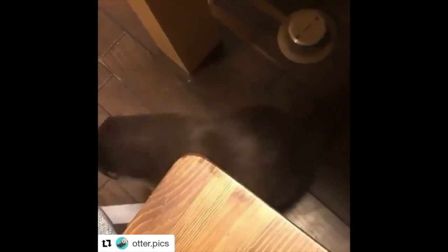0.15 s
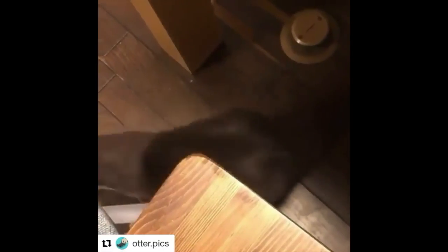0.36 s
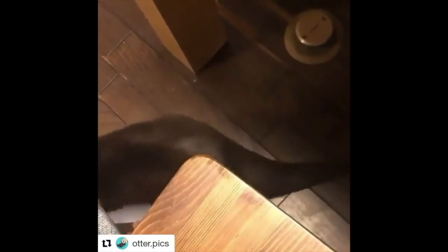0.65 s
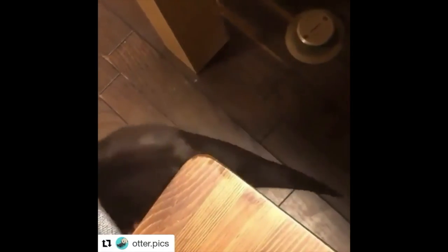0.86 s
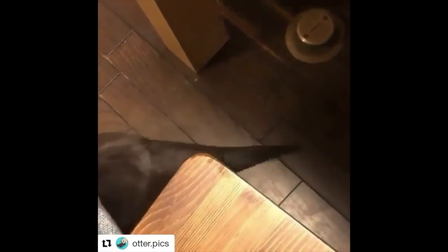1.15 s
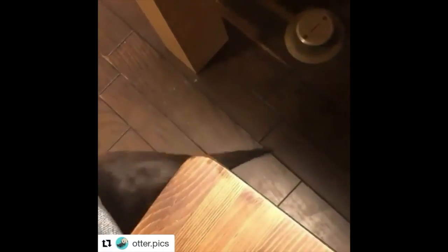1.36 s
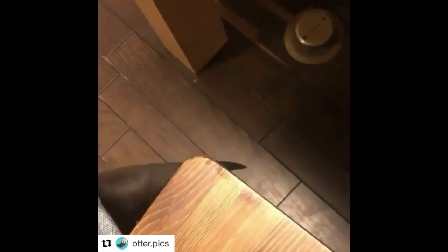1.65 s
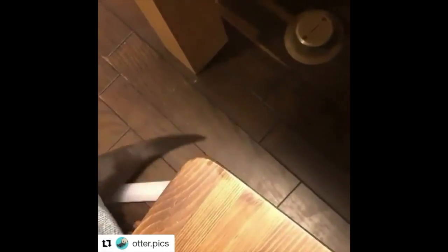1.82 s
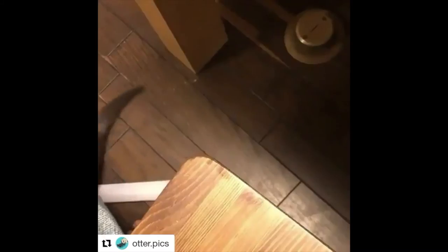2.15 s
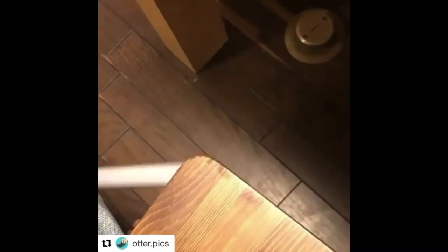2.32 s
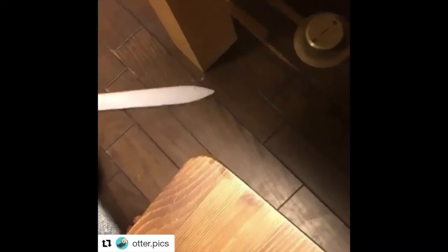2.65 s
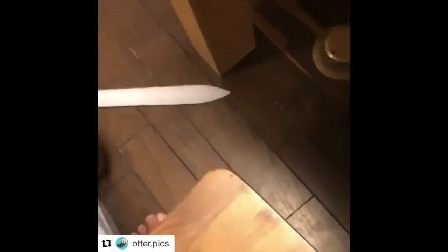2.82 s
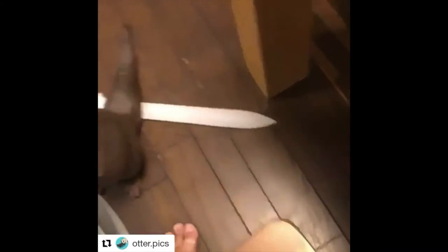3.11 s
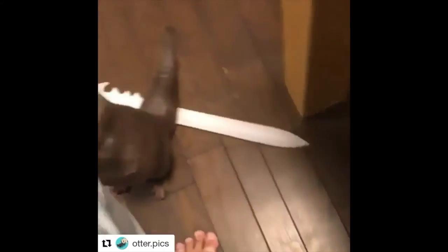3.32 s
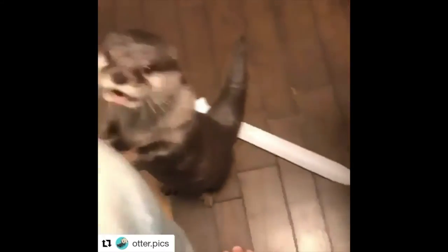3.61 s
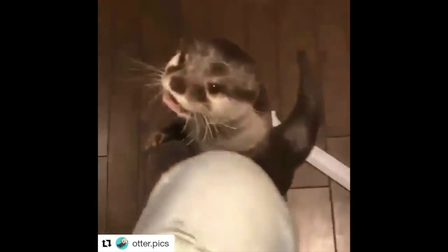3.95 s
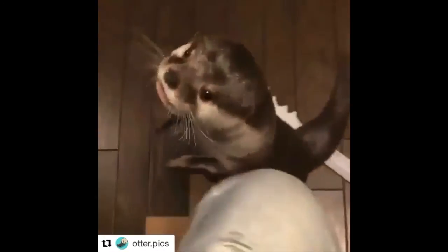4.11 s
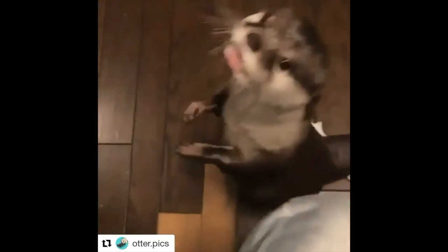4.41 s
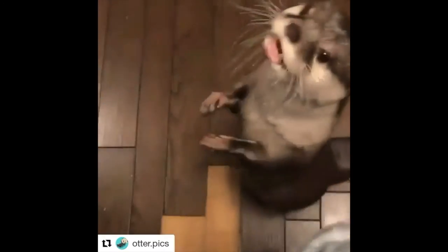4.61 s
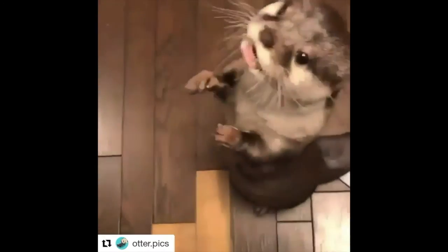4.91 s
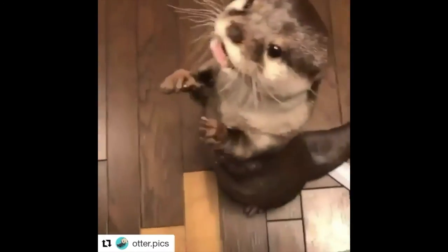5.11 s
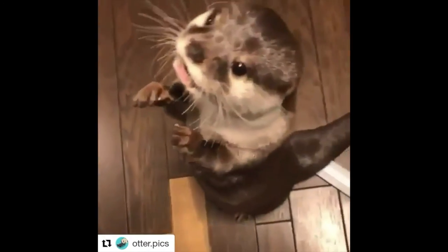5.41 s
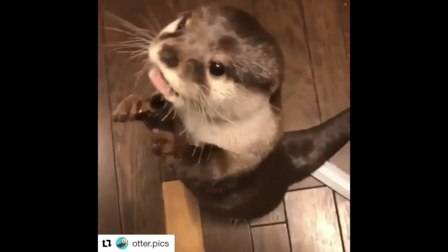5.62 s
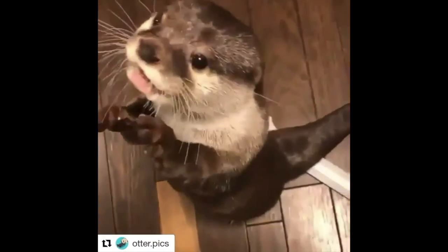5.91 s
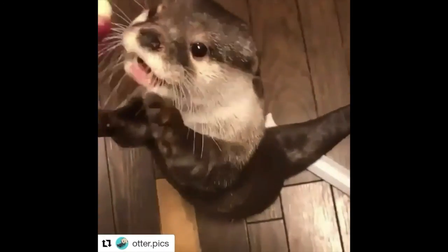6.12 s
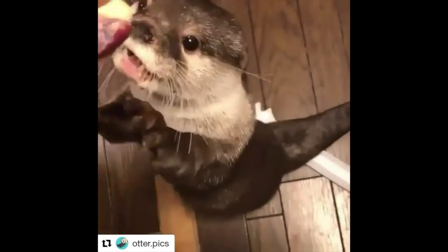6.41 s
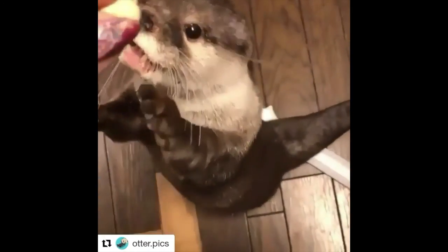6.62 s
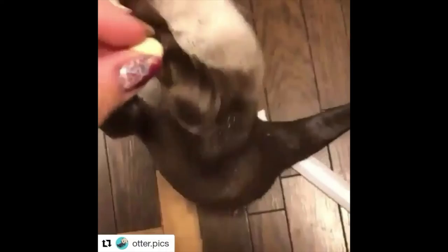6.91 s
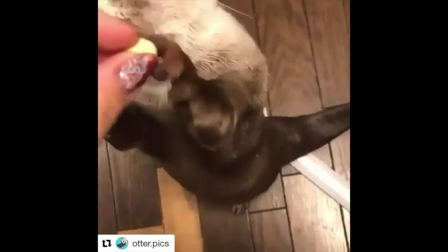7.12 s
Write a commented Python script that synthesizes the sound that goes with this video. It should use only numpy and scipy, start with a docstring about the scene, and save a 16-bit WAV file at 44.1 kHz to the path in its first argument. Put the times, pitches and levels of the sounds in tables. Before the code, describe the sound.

A small otter whines and squeals shrilly close by, with a few soft knocks and scuffles on a wooden floor.

```python
"""Otter begging for food

A small otter, close by, gives five long nasal whines, two of them opening with a shrill, rasping squeal:
pulses of its vocal folds ring the throat, nose and mouth. Between the first two whines it scrambles
over the floorboards and knocks a plastic toy about; a few more knocks and dull footfalls follow.
The living room adds a short tail and a faint steady rush."""
import sys
import numpy as np
from scipy import signal
from scipy.fft import rfft, irfft
from scipy.io import wavfile
from scipy.ndimage import uniform_filter1d

SR = 44100
rng = np.random.default_rng(int(sys.argv[2]) if len(sys.argv) > 2 else 0)


def int16_out(signal):
    """Quantize to a 16-bit WAV file."""
    q = np.round(np.clip(np.atleast_2d(signal).T, -1, 1) * 32767)
    wavfile.write(sys.argv[1], SR, q.astype(np.int16))


N = 320166
TIME = np.arange(N) / SR


def otter():
    """Fold pulses ring the throat; the shape of the mouth shares the effort among the resonances."""
    # path of the mouth's narrow, piercing resonance: time_s, centre_hz
    whistle_path = [(0, 3400), (2.65, 3130), (3.2, 2772), (4.0, 3101), (4.8, 2910), (7.2, 3110)]
    # path of the nasal resonance, which moves with the palate: time_s, centre_hz
    palate_path = [(0.2, 2440), (2.26, 2590), (2.4, 2000), (2.63, 2023), (2.85, 2448), (4.5, 2380),
                   (5.9, 2380), (6.21, 2770), (6.33, 2440), (7.22, 2582)]
    # resonances of mouth, teeth and lips: centre_hz, width_hz, gain_db
    mouth_modes = [(4294, 1600, 20.5), (5300, 1100, 17.5)]
    teeth_modes = [(5680, 940, 7.4), (7200, 1800, 0.91)]
    lip_modes = [(8410, 1570, 1.5), (11460, 2000, -5)]
    voiced, pitch, effort_db, rasp, low_db, octave_db, nose_db, mouth_db, shrill_db = phrasing()
    force_db = effort_db + 27.0
    # the voice catches in short fits that are both rougher and brighter
    fits = np.tanh(drift(19.6))
    rough = np.clip(rasp * from_db(2 * fits), 0, 1)
    flare_db = 5 * rough * fits
    quaver = rough * (.024 * drift(38) + .034 * drift(170))
    cycles = np.cumsum(pitch * (1 + quaver)) / SR
    phase = 2 * np.pi * cycles
    # air hisses through the folds once a cycle
    hiss = rms_one(rng.standard_normal(N) * (1 + np.cos(phase)))
    source = fold_pulses(cycles, rough, jitter_s=1e-4, shimmer_db=6) + .42 * rough * hiss
    # the mouth tunes its whistle part of the way towards the nearest harmonic
    resting_hz = in_time(whistle_path)
    tuned_hz = resting_hz + .55 * glided(np.round(resting_hz / pitch) * pitch - resting_hz)
    whistle = gliding_resonance(source, tuned_hz, width_hz=400)
    whistle = cut(cut(whistle, 3740, "high"), 3430, "low", order=4)
    palate = gliding_resonance(source, in_time(palate_path), width_hz=267)
    nose = cut(cut(palate, 1250, "high", order=3), 2884, "low", order=4)
    mouth = cut(cut(resonate(source, mouth_modes), 3400, "high"), 4870, "low", order=6)
    teeth = cut(resonate(source, teeth_modes), 8200, "low", order=6)
    # only the hardest squeals reach the topmost resonances
    lips = from_db(np.minimum(force_db, 3)) * resonate(source, lip_modes)
    edge = cut(teeth + lips, 1800, "high", order=4)
    spray = cut(hiss, 7600, "high", order=4)
    # the smooth part of the airflow carries the lowest harmonics
    flow = np.sin(phase) + from_db(octave_db) * np.sin(2 * phase) + from_db(-2.0) * np.sin(3 * phase)
    breath = rms_one(cut(cut(hiss, 716, "high", order=4), 3670, "low"))
    hum = flow + 1.5 * rough ** 1.16 * breath
    slack_db = np.minimum(force_db + 22.5, 0)   # slack folds close softly and lose their edge
    colours = [(whistle, .5), (hum, low_db), (scattered(nose), nose_db),
               (scattered(mouth), mouth_db + flare_db),
               (scattered(edge), shrill_db + flare_db + slack_db), (spray, -21 + flare_db)]
    # tongue and lips never hold still, so each colour wavers by itself
    gains = np.array([from_db(db + 1.5 * drift(28)) for _, db in colours])
    shares = gains / np.linalg.norm(gains, axis=0)
    voice = evened(sum(evened(colour) * share for (colour, _), share in zip(colours, shares)))
    return voiced * from_db(effort_db + 2.0 * rough * drift(30.5)) * voice


def phrasing():
    """Each note is an arch of effort; colour and roughness follow it, and the throat slackens."""
    # yips, whines and squeals (colours set the balance; the octave is against the fundamental):
    # start_s, peak_s, end_s, level_db, swell_db, fade_db, scoop_share, roughness,
    # low_db, octave_db, nose_db, mouth_db, shrill_db
    notes = np.array([ (0, 0.043, 0.079, -29.5, -2.5, 37, 0.031, 0.54, -4, -0.5, -17, 7, -3),
                      (0.041, 0.087, 0.17, -27.5, 8.5, 17, 0.014, 0.24, 6, 4.5, 14, 10.5, 20.5),
                      (0.129, 0.19, 0.52, -40.5, -5, 6.5, 0.32, 0.19, 9.5, 4.5, 5, -8, -22),
                      (0.508, 0.555, 0.62, -53, 1, 3.5, 0, 0.32, 28, -10, 5, -7, 1),
                      (2.209, 2.244, 2.27, -39.5, 17, -2, 0.035, 0.15, 35, -16, 4, -9, -20),
                      (2.243, 2.684, 3.14, -30, 12, 7, 0.024, 0.21, -7.5, -2, -4.5, 1, -1.5),
                      (2.813, 2.862, 3.134, -33, 0, 22.5, 0.018, 0.44, -6.5, -3, -11, -4, -10),
                      (3.12, 3.31, 3.682, -28.7, 18, 1.5, 0, 0.37, -13, 5, -2.5, -7, -15),
                      (3.848, 3.923, 4.245, -21.5, 12, -1, 0, 0.44, -17, 8, -12.5, -1.8, -0.5),
                      (4.228, 4.25, 4.895, -29, -7, 2.5, 0.16, 0.42, -9, 5, -20, -5.5, -11.5),
                      (5.064, 5.34, 5.94, -26, 12, 4.5, 0.13, 0.39, -10, 4.5, -3.5, -3.5, -14),
                      (6.186, 6.33, 6.872, -24.5, 8.5, 3, 0.26, 0.39, -9.5, 0.5, -5, -5.5, -16),
                      (6.806, 7.217, 7.4, -26.5, 6, 0, 0, 0.39, -4, 2, -1.5, -3, -20)])
    # one melody for each phrase: time_s, pitch_hz
    melodies = [
        [(0.0, 467.6), (0.035, 397.5), (0.095, 385.5), (0.13, 433)],
        [(0.17, 623), (0.505, 634), (0.545, 417), (0.6, 343)],
        [(2.23, 826), (2.282, 791), (2.392, 675.6), (2.61, 628.7), (2.785, 496.5), (2.836, 612.5), (2.864, 667),
         (2.908, 672), (2.984, 553), (3.08, 527)],
        [(3.1, 519), (3.22, 548.4), (3.3, 601), (3.32, 560.4), (3.66, 597.4)],
        [(3.85, 480), (3.998, 430.5), (4.114, 460.8), (4.22, 454.5)],
        [(4.29, 605.2), (4.36, 637), (4.536, 590.2), (4.664, 584.6), (4.72, 555.5)],
        [(5.12, 565.6), (5.252, 574.8), (5.282, 550), (5.78, 605), (5.91, 585)],
        [(6.24, 572), (6.42, 638), (6.526, 605.6), (6.84, 611.6), (7.116, 633.4), (7.202, 658), (7.25, 648)],
    ]
    # the voice jumps out or catches for a moment: time_s, half_length_s, gain_db, nose_db, shrill_db
    yelps = [(0.34, 0.027, 8.5, 8, -3), (2.247, 0.0092, 4, 9, 2), (2.611, 0.041, 3.5, 2, -6.5),
             (4.265, .012, 6, 9.5, 3.5), (4.765, 0.018, 3, 15, 8.5), (5.076, 0.012, 8.5, 0, 2),
             (6.193, 0.0066, 8.5, 7, 8), (6.208, 0.011, 4, 10.5, 10), (6.24, 0.015, -8.5, 4, 19),
             (6.42, 0.04, 3.5, 7, 3.5), (7.2, 0.047, 5, 6.5, 7.5)]
    # the voice breaks into a grainy rasp: time_s, half_length_s, added_roughness
    rasps = [(0.345, 0.029, 0.3), (0.445, 0.075, 0.49), (2.35, .11, .22), (2.78, 0.1, 0.33),
             (4.75, 0.036, 0.39), (5.29, 0.047, 0.29), (6.3, 0.051, 0.36)]
    attack_s, release_s = .003, .019
    scoop_s, droop_s, droop_share = .016, .014, .16
    shrill_sag_db_per_s, rough_sag_per_s = 14, .148
    now = np.maximum(np.searchsorted(notes[:, 0], TIME, "right") - 1, 0)
    start, peak, end, level_db, swell_db, fade_db, scoop, rough, *colours = notes[now].T
    low_db, octave_db, nose_db, mouth_db, shrill_db = colours
    since, left = np.maximum(TIME - start, 0), np.maximum(end - TIME, 0)
    past_peak = np.minimum(TIME, end) - peak
    # a note that starts before the last has ended is slurred on to it
    slurred = np.r_[False, notes[1:, 0] < notes[:-1, 2]][now]
    attack = np.where(slurred, 1, np.minimum(since / attack_s, 1))
    voiced = attack * np.minimum(left / release_s, 1)
    arch_db = (-swell_db * np.clip(-past_peak / (peak - start), 0, 1) ** 1.7
               - fade_db * np.clip(past_peak / (end - peak), 0, 1) ** 1.23)
    yelp_db, yelp_nose_db, yelp_shrill_db = swells(yelps)
    rasp, = swells(rasps)
    phrase = np.searchsorted([curve[-1][0] for curve in melodies[:-1]], peak)
    melody = np.choose(phrase, [in_time(curve) for curve in melodies])
    # a note slides up to its pitch and falls off it at the end
    pitch = melody * (1 - scoop * np.exp(-since / scoop_s)) * (1 - droop_share * np.exp(-left / droop_s))
    controls = [
        pitch,
        level_db + arch_db + yelp_db,
        rough + .009 * arch_db + rasp - rough_sag_per_s * np.maximum(past_peak, 0),
        low_db - .5 * arch_db - yelp_db,   # effort and yelps leave the lowest harmonics behind
        octave_db,
        nose_db + yelp_nose_db,
        mouth_db + .55 * arch_db,
        shrill_db + .86 * arch_db + yelp_shrill_db - shrill_sag_db_per_s * past_peak]
    return [voiced] + [glided(control) for control in controls]


def fold_pulses(cycles, rough, jitter_s, shimmer_db):
    """The folds snap shut once a cycle; roughness upsets the timing and strength of each snap."""
    closing = np.interp(np.arange(1, int(cycles[-1])), cycles, np.arange(N))
    unrest = rough[closing.astype(int)]
    late, strong = rng.uniform(-.8, .8, (len(closing), 2)).T
    # rough folds limp in twos or threes
    stride = np.where(drift(10)[closing.astype(int)] > 0, 2, 3)
    limp = .95 * unrest * np.cos(2 * np.pi * np.cumsum(1 / stride))
    closing = closing + jitter_s * SR * unrest * (late + limp)
    strength = from_db(shimmer_db * unrest * (strong + limp))
    # a windowed sinc places each snap between samples
    taps = closing.astype(int)[:, None] + np.arange(-5, 7)
    offset = taps - closing[:, None]
    snaps = np.sinc(offset) * np.sinc(offset / 7) * strength[:, None]
    return rms_one(np.bincount(np.clip(taps, 0, N - 1).ravel(), snaps.ravel(), N))


def scattered(x, count=5, echo_db=-9.5, sway_s=9e-5):
    """Treble bounces off floor and furniture; as the head sways, each harmonic swells and fades."""
    lags_s = np.geomspace(.0007, .009, count) * rng.uniform(.8, 1.2, count)
    echoes = sum(np.interp(TIME - lag - sway_s * drift(7.26), TIME, x) for lag in lags_s)
    return x + from_db(echo_db) * echoes


def knocks():
    """Each blow rings the boards, with a short clatter at its own pitch and a tick of claw or plastic."""
    # paws and toy hit the floor: start_s, level_db, clatter_hz, tick_offset_db
    blows = [(1.108, -41.5, 700, -24), (1.562, -53, 450, -33), (1.664, -47.5, 900, -13.5),
             (1.86, -31.5, 560, -30), (2.037, -45.5, 334, -48), (3.869, -42.5, 560, -26),
             (4.086, -44, 930, -35), (5.07, -46.5, 220, 6), (6.088, -48, 1205, -21)]
    # modes of the floorboards: pitch_hz, gain_db, t60_s
    board_modes = [(133, -6, 0.5), (305, -2.5, 0.45), (538, -8, 0.2), (785, 2, 0.12)]
    start_s, level_db, clatter_hz, tick_offset_db = np.transpose(blows)
    boards = sum(ring(clicks(start_s, level_db + mode_db + rng.normal(0, 5.9, len(blows))), hz, t60_s)
                 for hz, mode_db, t60_s in board_modes)
    rattle = cut(rng.standard_normal(N), 1930, "low")
    clatter = 0
    for at, db, hz in zip(start_s, level_db, clatter_hz):
        envelope = cut(fading(clicks([at], [db]), t60_s=0.21), 140, "low", order=1)
        clatter = clatter + envelope * rms_one(resonate(rattle, [(hz, hz, 0)]))
    bright = cut(cut(rng.standard_normal(N), 2600, "high"), 5900, "low")
    tick = fading(clicks(start_s, level_db + tick_offset_db), t60_s=0.1) * bright
    return from_db(-8.5) * cut(boards, 63, "high") + clatter + from_db(19.5) * tick


def scuffle():
    """Fur and claws rub unevenly over the wood."""
    # slides across the floor: peak_s, level_db, rise_db_per_s, fall_db_per_s
    slides = [(1.14, -49, 195, 200), (1.44, -50, 246, 118), (1.675, -41.5, 206, 126), (2.7, -39.5, 100, 51)]
    # spectrum of the rubbing: frequency_hz, density_db
    rub_spectrum = [(30, -36), (130, -14), (800, -1.5), (1500, -5.5), (3000, -13), (6000, -24),
                    (14000, -29)]
    envelope = sum(from_db(db - np.maximum(rise * (peak_s - TIME), fall * (TIME - peak_s)))
                   for peak_s, db, rise, fall in slides)
    return from_db(-3.5 + 2.0 * drift(98)) * envelope * noise(rub_spectrum)


def thuds():
    """Soft weight sets the whole floor swinging."""
    # dull footfalls: start_s, level_db
    footfalls = [(5.608, -54), (6.109, -56.5), (6.539, -54.5)]
    floor = ring(clicks(*np.transpose(footfalls)), hz=71.2, t60_s=0.15)
    return cut(from_db(12.0) * floor, 127.8, "low")


def room(x, t60_s=0.42, tail_db=-12):
    """A short diffuse tail from walls and furniture follows the direct sound."""
    t = TIME[:SR]
    onset = np.clip(t / 0.0038 - 1, 0, 1)
    tail = rng.standard_normal(SR) * np.exp(-np.log(1000) * t / t60_s) * onset
    return x + from_db(tail_db) * signal.fftconvolve(x, tail / np.linalg.norm(tail))[:N]


def room_tone(level_db=-60):
    """A faint, steady rush of air."""
    # spectrum of the rush: frequency_hz, density_db
    air_spectrum = [(25, -22), (60, -8), (200, -7), (450, -12.5), (1500, -18.5), (14000, -35.5)]
    return from_db(level_db) * noise(air_spectrum)


def from_db(db):
    """Decibels to gain."""
    return 10 ** (np.asarray(db) / 20)


def rms_one(x):
    """Scale to unit power."""
    return x / np.sqrt(np.mean(x ** 2) + 1e-20)


def evened(x):
    """Hold the power at one over every few hundredths of a second."""
    return x / np.sqrt(np.abs(uniform_filter1d(x ** 2, size=1100)) + 1e-12)


def in_time(curve):
    """A curve of (time_s, value) points at every sample."""
    return np.interp(TIME, *np.transpose(curve))


def glided(x):
    """The throat takes a moment to move from one setting to the next."""
    return uniform_filter1d(x, size=440)


def swells(rows):
    """Each column of heights as a sum of short bell-shaped swells."""
    return sum(np.outer(heights, np.exp(-np.minimum(((TIME - time_s) / half_s) ** 2, 20)))
               for time_s, half_s, *heights in rows)


def cut(x, hz, kind, order=2):
    """Butterworth low-pass or high-pass."""
    return signal.sosfilt(signal.butter(order, hz, kind, fs=SR, output="sos"), x + 1e-18)


def drift(hz):
    """A random wander of unit power, mostly slower than hz."""
    return rms_one(cut(rng.standard_normal(N + SR), hz, "low")[SR:])


def noise(spectrum):
    """Noise of a given colour, unit power."""
    hz, db = np.transpose(spectrum)
    bins_hz = np.maximum(np.fft.rfftfreq(N, 1 / SR), 1)
    gain = from_db(np.interp(np.log(bins_hz), np.log(hz), db))
    return rms_one(irfft(rfft(rng.standard_normal(N)) * gain, N))


def resonate(x, resonances):
    """Parallel resonances with alternating signs."""
    out = 0
    for k, (hz, width_hz, db) in enumerate(resonances):
        r = np.exp(-np.pi * width_hz / SR)
        poles = [1, -2 * r * np.cos(2 * np.pi * hz / SR), r * r]
        band = signal.lfilter([1, 0, -1], poles, x + 1e-18) * (1 - r * r) / 2
        out = out + (-1) ** k * from_db(db) * band
    return out


def gliding_resonance(x, hz, width_hz):
    """A resonance whose centre moves from sample to sample."""
    spin = np.exp(2j * np.pi * np.cumsum(hz) / SR)
    r = np.exp(-np.pi * width_hz / SR)
    return 2 * (spin * signal.lfilter([1 - r], [1, -r], x / spin)).real


def ring(x, hz, t60_s):
    """A unit click sets a sine of height one ringing."""
    r, w = from_db(-60 / (t60_s * SR)), 2 * np.pi * hz / SR
    return signal.lfilter([0, np.sin(w)], [1, -2 * r * np.cos(w), r * r], x + 1e-18)


def clicks(times_s, db):
    """Single-sample blows at the given times."""
    return np.bincount((np.asarray(times_s) * SR).astype(int), from_db(db), N)[:N]


def fading(x, t60_s):
    """Every click leaves an envelope that dies away."""
    return signal.lfilter([1], [1, -np.exp(-np.log(1000) / (t60_s * SR))], x + 1e-18)


def scene():
    """The otter and its scrambling in the room, over a faint steady rush; mono."""
    near = from_db(0.5) * otter() + knocks() + thuds() + scuffle()
    return (room(near) + room_tone())[None]


def record(dry):
    """The highest treble is cut steeply."""
    cutoff_hz = 13900
    return signal.sosfilt(signal.ellip(10, .2, 80, cutoff_hz, fs=SR, output="sos"), dry)


dry = scene()
out = record(dry)
int16_out(out)
```